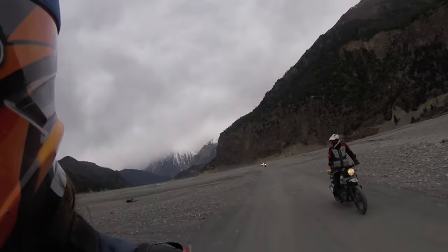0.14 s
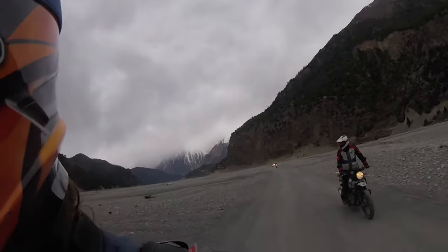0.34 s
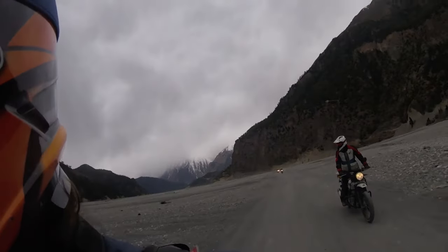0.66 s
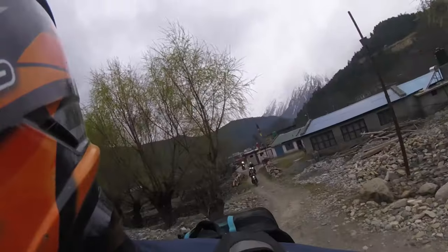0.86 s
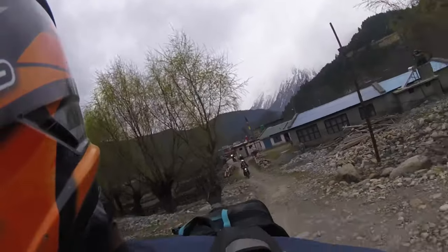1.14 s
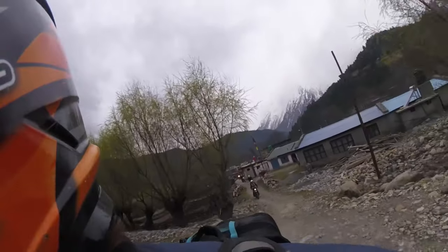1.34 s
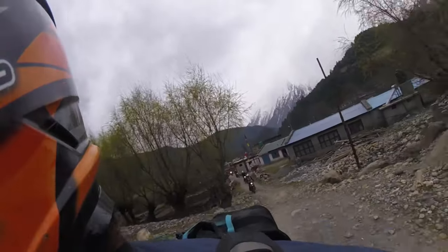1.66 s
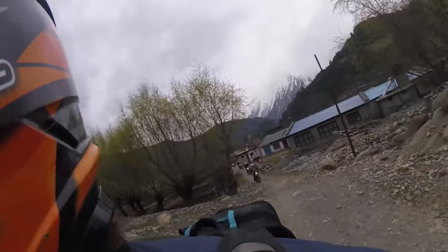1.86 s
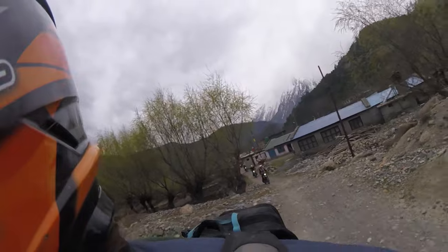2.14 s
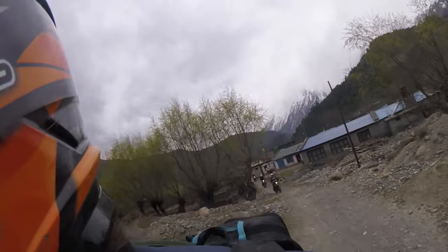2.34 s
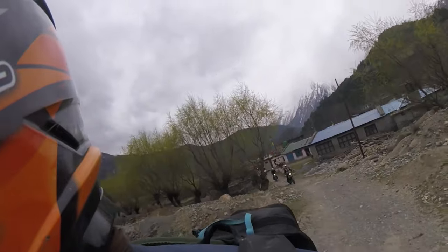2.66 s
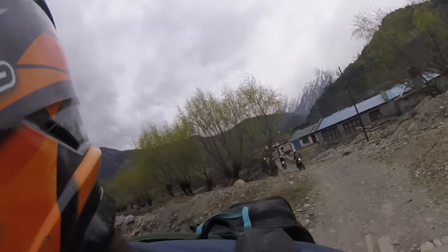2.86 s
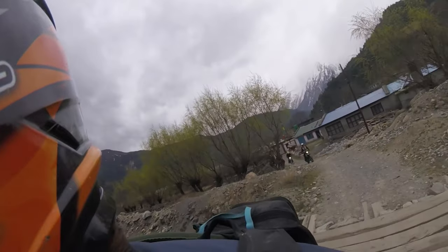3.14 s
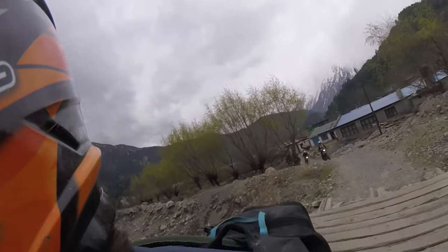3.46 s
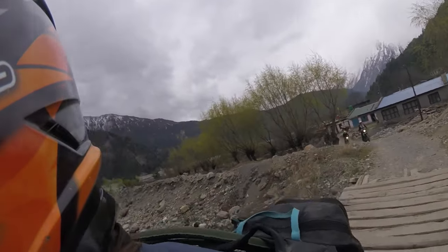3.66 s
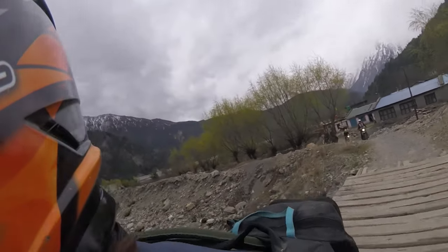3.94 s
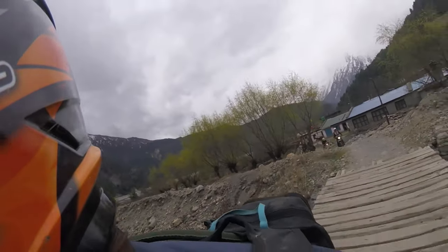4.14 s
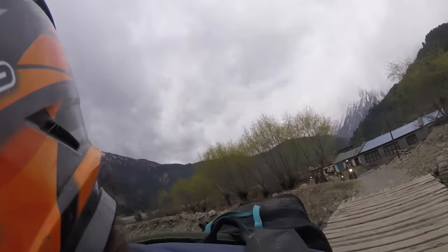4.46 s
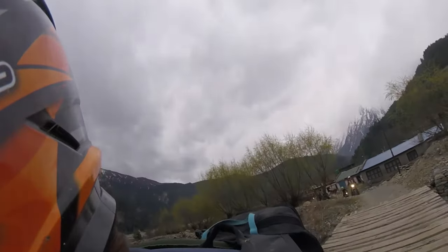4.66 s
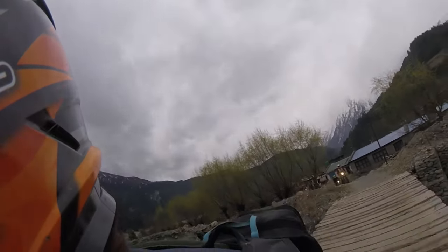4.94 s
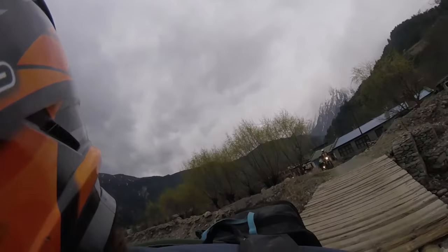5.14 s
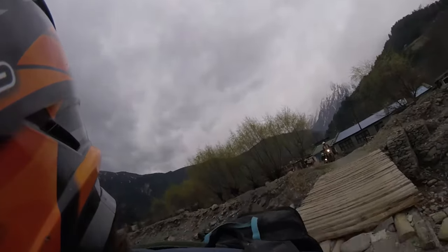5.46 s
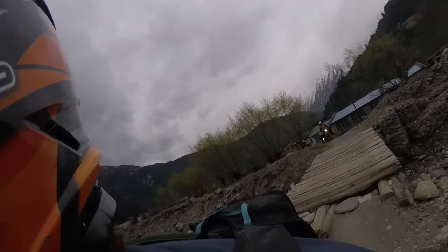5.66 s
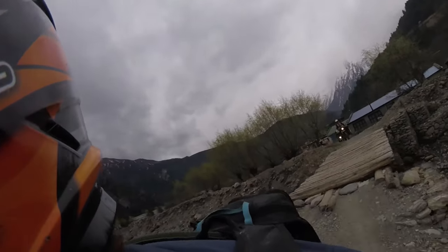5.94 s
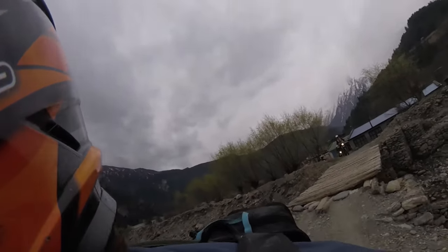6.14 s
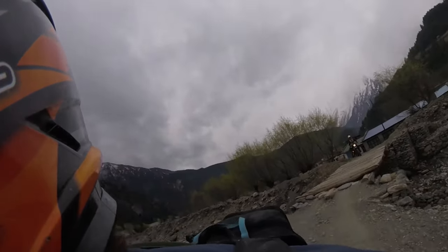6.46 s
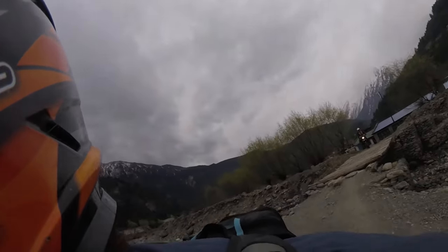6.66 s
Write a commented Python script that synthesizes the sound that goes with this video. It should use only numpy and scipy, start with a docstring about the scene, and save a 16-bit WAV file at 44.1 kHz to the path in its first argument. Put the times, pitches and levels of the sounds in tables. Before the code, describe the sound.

Rushing wind batters a microphone beside a motorcycle rider's helmet, then abruptly drops to a slower engine thudding along rough track and over hollow knocking planks.

```python
"""A single-cylinder motorcycle thuds, clatters and whines under a small cased microphone by the rider's helmet.
First a fast gravel flat in rushing wind; at 0.9 s, abruptly, a slow rough track and a plank bridge.
Engine: firing pulses through exhaust resonances, shaken noise through ringing metal, and a gear tone.
Wind: noise in four bands, with single swings of pressure at the case. Planks: decaying tones under each blow.
Close to the microphone: filtered noise bursts for ticks, scrapes, clacks and stones, and a treble hiss."""
import sys
import numpy as np
from scipy import signal
from scipy.fft import rfft, irfft
from scipy.io import wavfile
from scipy.ndimage import uniform_filter1d, minimum_filter1d

SR = 44100
rng = np.random.default_rng(int(sys.argv[2]) if len(sys.argv) > 2 else 0)


def persist_wave(psi):
    """Save psi, clipped to +-1, as 16-bit WAV."""
    counts = np.round(np.clip(psi, -1, 1) * 32767).astype(np.int16)
    wavfile.write(sys.argv[1], SR, np.atleast_2d(counts).T)


N = 299880
TIME = np.arange(N) / SR


def amp(db):
    """Decibels to gain."""
    return 10 ** (np.asarray(db) / 20)


def unit(x):
    """Scales to rms 1."""
    return x / np.sqrt(np.mean(x ** 2) + 1e-20)


def follow(rows, axis=1):
    """One column of a curve, interpolated at every sample."""
    rows = np.asarray(rows)
    return np.interp(TIME, rows[:, 0], rows[:, axis])


def add(mix, s, sound):
    """Mixes a sound in at a time in seconds."""
    part = mix[max(round(s * SR), 0):][:len(sound)]
    part += sound[:len(part)]


def colour(x, points, size=16384):
    """Causal minimum-phase filter with the given spectrum and falling skirts."""
    hz, db = np.transpose(points)
    bins = abs(np.fft.fftfreq(size, 1 / SR)) + 1
    skirt = np.minimum(bins / hz[0], 1) ** 2 * np.minimum(hz[-1] / bins, 1) ** 2
    gain = amp(np.interp(np.log(bins), np.log(hz), db)) * skirt
    log_gain = np.log(gain + 1e-6)
    taps = np.fft.ifft(np.exp(np.conj(signal.hilbert(log_gain)))).real[:size // 2]
    return signal.oaconvolve(x, taps)[:len(x)]


def band(x, lo_hz, hi_hz, order=6):
    """Keeps one band, with smooth edges."""
    hz = np.fft.rfftfreq(len(x), 1 / SR) + 1e-3
    return irfft(rfft(x) / (1 + (lo_hz / hz) ** order) / (1 + (hz / hi_hz) ** order), len(x))


def wander(lo_hz, hi_hz):
    """Random wavering between two rates, scaled to rms 1 and then clipped."""
    return np.clip(unit(band(rng.standard_normal(N), lo_hz, hi_hz)), -2.5, 2.5)


def steady(x, size=7000):
    """Evens the level to about rms 1, with the quick lumps kept; size in samples."""
    power = uniform_filter1d(uniform_filter1d(x ** 2, size), size // 2)
    return x / np.sqrt(abs(power) + 1e-20)


def swell(s, half_s):
    """A smooth rise and fall around one moment."""
    return np.exp(-.5 * ((TIME - s) / half_s) ** 2)


def swing(t, hz):
    """One swing of pressure, down and then up, of height 1."""
    u = 2 * np.pi * hz * t
    return u * np.exp((1 - u ** 2) / 2)


def ring(x, modes):
    """Passes a sound through parallel resonances."""
    return sum(amp(db) * signal.lfilter(*signal.iirpeak(hz, hz / width, SR), x) for hz, width, db in modes)


def resonate(x, hz, width):
    """A resonance that follows a moving pitch."""
    turn = np.exp(2j * np.pi * np.cumsum(hz) / SR)
    r = np.exp(-np.pi * width / SR)
    return 2 * (turn * signal.lfilter([1 - r], [1, -r], x / turn)).real


# Hiss inside the case: [t/s, level/dB]
HISS = [(0, -45.5), (0.5, -50.5), (0.88, -50.5), (0.93, -54.5), (1.7, -54), (2.3, -54.5), (2.64, -57.5),
        (2.9, -54.5), (3.45, -55.5), (3.9, -60.5), (4.35, -55), (4.9, -52.5), (5.25, -56.5), (6.15, -54.5),
        (6.52, -58), (6.8, -52)]
# Colour of the case around the microphone: [f/Hz, relative level/dB]
CASE = [(1500, -6), (3000, -13.5), (4400, -21), (5200, -15), (5680, -8.5), (5950, -13.5), (6270, -9.5),
        (6450, 1.5), (6620, -3.5), (6850, -5.5), (7400, -11.5), (8000, -16.5), (8280, -13.5), (8600, -17.5),
        (9300, -21.5), (9480, -18.5), (9700, -25), (10500, -39), (11300, -66)]


def hiss(cycle, grit_per_s=45):
    """Air, valve gear and fine grit excite the treble resonance of the case, over a faint fizz."""
    valves = 1 + .5 * np.exp(-(3 * cycle % 1) / 0.1)  # three pulses in each cycle
    grit = (rng.random(N) < grit_per_s / SR) * np.minimum(rng.exponential(13.0, N), 20)
    drive = valves * amp(0.95 * wander(1.2, 60)) * rng.standard_normal(N) + grit
    faint_fizz = amp(-76.5) * unit(band(rng.standard_normal(N), 7000, 13000))
    return unit(colour(drive, CASE)) * amp(follow(HISS)) + faint_fizz


# Airflow on the flat, swinging from low rumble to bright rush:
# [t/s, wind level/dB, extra rush/dB, extra rumble/dB, extra flapping/dB]
FAST_WIND = [(0, -17.5, -2.5, 10, 4), (0.19, -18.5, -2, -0.5, -1), (0.52, -26.5, 3.5, 5.5, -0.5),
             (0.66, -25.5, 1, 2, -1.5), (0.89, -20.5, 3.5, -3.5, -1.5)]
# Airflow on the track, rising and falling: same columns
SLOW_WIND = [(0.91, -20.5, 2, -7, -0.5), (1.2, -25.5, 4.5, -1.5, 4), (1.36, -20, 4, 2, 0),
             (1.65, -22.5, 1, -10, 2.5), (1.95, -21, -2, -1, 0.5), (2.25, -22.5, -4, -2, 1.5),
             (2.5, -27, -6.5, -4, 1.5), (2.8, -25.5, -0.5, -6, -0.5), (3.03, -26, 3.5, -2, -2),
             (3.25, -27, 0.5, 0, -0.5), (3.5, -30.5, 2, 0, 0.5), (3.8, -27.5, -2, 8, 0.5),
             (4.05, -25, -4.5, 5, -4.5), (4.25, -20.5, 0, -7.5, -6), (4.6, -24.5, -4, 4.5, -1.5),
             (5.3, -31.5, -0.5, 3, 0), (5.95, -17, -2.5, 1, -2), (6.8, -18.5, 1, 4.5, 0.5)]
# Wind colour on the flat, then on the track: [f/Hz, relative level/dB]
FAST_AIR = [(8.8, -19), (15, -13), (48, -11.5), (109, -5), (141, -8), (394, -10.5), (606, -15.5),
            (1240, -21), (1820, -29), (3810, -54.5), (4500, -59), (5850, -83), (9900, -120)]
SLOW_AIR = [(8.8, -34.5), (15, -3.5), (64, 3), (109, 0.5), (156, -1), (228, -6), (376, -13), (444, -15),
            (847, -29.5), (1000, -32.5), (1210, -38), (1540, -45), (4500, -77.5), (5850, -97.5),
            (9900, -120)]
# Gusts swell over the wind and lulls interrupt it: [t/s, change of level/dB, half length/s]
GUSTS = [(0.06, -6.5, 0.086), (0.151, 7, 0.0058), (0.257, -5, 0.0091), (0.399, 5, 0.015), (0.503, 5, 0.016),
         (0.638, 6.5, 0.057), (0.782, -6, 0.01), (1.925, -8.5, 0.0084), (2.258, 5, 0.031), (3.207, -5, .03),
         (3.688, 6, 0.078), (3.798, -10.5, 0.0078), (3.87, 7.5, 0.073), (4.445, -11, 0.016),
         (4.803, 5, 0.056), (6.422, 5.5, 0.044), (6.467, -13, 0.0083)]
RUMBLE_SHARE, RUSH_SHARE = 0.45, 1.07  # dB gained by rumble and rush for each dB of wind


def wind(curve, air, rumble_db, body_db, flap_db, rush_db, lumpy_db, spiky_db, patchy_db=1.5):
    """One wind strength drives four bands; the same eddies shape them all, cutting deeper into the rush."""
    mean_db = np.mean([row[1] for row in curve])
    gust_db = sum(db * swell(s, half) for s, db, half in GUSTS)
    force_db = follow(curve) - mean_db + gust_db
    eddies, flow = wander(2.1, 89), rng.standard_normal(N)
    soft = colour(flow * amp(lumpy_db * eddies), air)
    sharp = colour(flow * amp(spiky_db * eddies), air)

    rumble_level = rumble_db + RUMBLE_SHARE * force_db + follow(curve, axis=3) + patchy_db * wander(2.5, 7.2)
    rumble = steady(band(soft, 8.2, 64.0), size=6500) * amp(rumble_level)
    body = steady(band(soft, 77.8, 190), size=3200) * amp(body_db + force_db)
    flap = steady(band(soft, 206.6, 320), size=3200) * amp(flap_db + force_db + follow(curve, axis=4))
    rush_level = rush_db + RUSH_SHARE * force_db + follow(curve, axis=2) + patchy_db * wander(4.1, 12.4)
    rush = steady(band(sharp, 342, 6000), size=3500) * amp(rush_level)
    return amp(mean_db) * (rumble + body + flap + rush)


# The airflow booms briefly on one low note: [t/s, peak level/dB before level_db, f/Hz, half length/s]
BOOMS = [(1.37, -14.5, 112.4, 0.039), (1.445, -16.5, 135, 0.022), (1.59, -18, 163.5, 0.016),
         (1.831, -17, 136, 0.0049), (3.722, -18.5, 75.2, 0.018), (3.836, -16, 78, 0.019),
         (4.737, -19.5, 124.7, 0.029), (5.31, -22, 78.1, 0.029), (5.51, -21.5, 113, 0.042),
         (5.76, -18, 91, 0.018), (5.844, -11.5, 128.3, 0.0081), (6.022, -16, 103.9, 0.024),
         (6.09, -13, 78.7, 0.029), (6.268, -11.5, 95.1, 0.016), (6.305, -18, 161.9, 0.028),
         (6.41, -17, 130, 0.02), (6.757, -13, 135.1, 0.017)]


def booms(level_db=-1, waver=0.033):
    """The air at the case swings for a few cycles around one wavering pitch."""
    clock = np.cumsum(1 + waver * wander(4.2, 30)) / SR
    return sum(amp(db + level_db) * swell(s, half) * np.sin(2 * np.pi * hz * clock)
               for s, db, hz, half in BOOMS)


# The airflow tears off the case with a slap: [t/s, peak level/dB before level_db]
SLAPS = [(0.18, -12), (0.378, -16), (0.733, -15), (0.917, -26), (0.953, -21.5), (1.091, -25),
         (1.386, -19.5), (1.508, -28), (1.785, -26), (6.112, -29), (6.368, -21), (6.486, -28), (6.74, -24)]


def slaps(level_db=-0.5, front_s=0.0011, tear=0.16, tear_s=0.0021, low_hz=300, top_hz=900):
    """The airflow tears off the case: a steep front of pressure and a brief ragged tail."""
    out, t = np.zeros(N), np.arange(2048) / SR
    reach = signal.butter(3, [low_hz, top_hz], "band", fs=SR, output="sos")
    for s, db in SLAPS:
        front = (t / front_s - 1) * np.exp(-t / front_s)
        tail = tear * rng.standard_normal(len(t)) * np.exp(-t / tear_s)
        slap = signal.sosfilt(reach, front + tail)
        add(out, s, amp(db + level_db) * slap / abs(slap).max())
    return out


# Single eddies hit the case:
# [t/s, peak level/dB before level_db, f of the swing/Hz, level of the rush/dB before spurt_db]
BUFFETS = [(0.179, -8.5, 49.7, -24), (0.635, -1.5, 275, -20), (0.727, -14, 67, -22), (0.817, -7, 74, -49),
           (0.917, -12.5, 185, -30.5), (0.951, -10, 191, -37), (0.993, -10, 154, -36),
           (1.095, -8.5, 119, -30), (1.343, -4, 112, -42), (1.381, -5, 97, -23), (1.509, -5, 106, -26.5),
           (1.549, -11.5, 125, -28), (1.782, -10.5, 178, -34), (2.005, -11.5, 170, -55),
           (2.355, -12.5, 88, -37), (2.573, -6.5, 107, -40), (3.696, -21, 70, -33),
           (3.771, -8.5, 130.8, -56), (3.81, -10, 70, -46), (3.822, -3.5, 75, -46), (3.881, -12, 85, -40),
           (3.897, -11.5, 150, -37), (3.962, -17, 90, -47), (6.016, -7, 84.5, -43), (6.109, -10, 108, -41),
           (6.496, 1, 84.4, -24.5), (6.737, -5.5, 147, -28)]


def buffets(level_db=-3, spurt_db=1.5, lag_s=0.00556, rise_s=0.0028, spurt_s=0.0032):
    """A passing eddy sucks and then pushes on the case: one swing of pressure, with a spurt of rush."""
    out, t = np.zeros(N), np.arange(2048) / SR - .01  # starts early, to hold the suction
    for s, db, hz, rush_db in BUFFETS:
        rush = steady(band(rng.standard_normal(len(t)), 180, 400, order=3), size=300)
        age = np.maximum(t - rise_s, 0) / spurt_s
        spurt = rush * age * np.exp(1 - age)
        push = swing(t - lag_s, hz)
        add(out, s + t[0], amp(db + level_db) * push + amp(rush_db + spurt_db) * spurt)
    return out


def click(s=0.75, db=-20):
    """One thin, dry click, a decaying pulse, shortly before the fast wind breaks off."""
    out = np.zeros(N)
    add(out, s, amp(db) * np.exp(-np.arange(16.)))
    return out


# Colour of a light touch on the case: [f/Hz, relative level/dB]
TOUCH = [(800, -2.5), (1300, 1), (1800, -9), (3000, -10), (4100, -16), (5200, -8.5), (6000, -4.5),
         (6470, 5.5), (6900, 0.5), (7400, -6.5), (8500, -14.5), (9450, -17.5), (10200, -27), (11500, -66)]
# Gear and grit tick on the case: [t/s, peak level/dB, thinned below f/Hz]
TICKS = [(0.4913, -29, 3500), (0.502, -27.5, 3500), (0.5816, -25.5, 4500), (0.6727, -36, 2000),
         (0.829, -30.5, 3500), (0.891, -31, 3500), (0.9648, -33, 3000), (1.042, -38, 3000),
         (1.102, -37, 3000), (3.3525, -36, 4500), (3.48, -34.5, 2000), (4.0365, -37, 3500),
         (4.1375, -33, 2500), (4.2693, -30.5, 5000), (4.476, -32.5, 1500), (4.833, -42, 1500),
         (4.924, -34.5, 3000), (4.9505, -37.5, 3000)]


def ticks(t60_s=0.016):
    """Gear and grit tap the case: short bright snaps of decaying noise."""
    out, t = np.zeros(N), np.arange(4096) / SR
    for s, db, thin_hz in TICKS:
        snap = rng.standard_normal(len(t)) * amp(-60 * t / t60_s)
        snap[0] += 2
        tick = signal.lfilter(*signal.butter(1, thin_hz, "high", fs=SR), colour(snap, TOUCH))
        add(out, s, amp(db) * tick / abs(tick).max())
    return out


# Gear slips along the case: [t/s at its strongest, level/dB before level_db, half length/s,
# f of the squeak/Hz, glide of the squeak/Hz per ms, share of squeak 0-1]
SCRAPES = [(4.139, -42, 0.0025, 6100, 0, 0.8), (4.145, -44, 0.0024, 6150, 0, 0.7),
           (4.16, -44, 0.0016, 6700, 0, 0.5), (4.168, -46, 0.001, 7000, 0, 0.3),
           (4.174, -41, 0.0013, 6640, 0, 0.7), (4.181, -41, 0.0017, 6500, 0, 0.35),
           (4.184, -46.5, 0.024, 6800, 0, 0.2), (4.1927, -34, 0.001, 7300, 0, 0.5),
           (4.199, -43, 0.0018, 7000, 0, 0.5), (4.2026, -36, 0.0016, 8080, 200, 0.8),
           (4.2363, -30.5, 0.00087, 6760, 852, 0.9), (4.344, -52.5, 0.052, 6560, 0, 0.2),
           (4.724, -35.5, 0.0047, 6550, 0, 0.3), (4.767, -44, 0.0052, 6500, 0, 0.3),
           (5.052, -40, 0.0048, 6400, 0, 0.1)]


def scrapes(level_db=1, grain_db=5.0, squeak_width_hz=450, catches_per_s=450, grit=0.73):
    """Gear slips grainily along the case, each slip squeaking at its own, sometimes rising pitch."""
    out = np.zeros(N)
    catches = rng.standard_normal(N) * (rng.random(N) < catches_per_s / SR)
    grain = unit(rng.standard_normal(N) * amp(grain_db * wander(60, 390)))
    rub = steady(colour(unit(grain + grit * unit(catches)), TOUCH), size=300)
    for s, db, half, hz, glide, share in SCRAPES:
        near = abs(TIME - s) < 4 * half
        pitch = hz + glide * 1000 * (TIME[near] - s)
        tone = resonate(rng.standard_normal(len(pitch)), pitch, squeak_width_hz)
        tone = unit(resonate(tone, pitch, squeak_width_hz))  # a second pass narrows the squeak
        slip = unit((1 - share) * rub[near] + share * tone)
        out[near] += amp(db + level_db) * swell(s, half)[near] * slip
    return out


# A buckle clacks against the case: [t/s, peak level/dB, decay of its chatter/s, brightness/dB per octave]
CLACKS = [(0.6098, -19.5, 0.00054, -4.5), (4.693, -37.5, 0.013, -4), (4.7188, -31, 0.003, -14),
          (4.725, -30, 0.0028, -6), (4.7345, -23, 0.0015, -1), (4.7488, -22, 0.002, -6),
          (4.7508, -14, 0.0014, 5), (4.7526, -13.5, 0.0012, 11), (5.047, -38, 0.0015, -7)]
# What the case rings with when hit: [f/Hz, width/Hz, level/dB before the brightness]
SHELL = [(2250, 150, -2), (3360, 160, -5.5), (4000, 350, -12.5), (5130, 100, -8), (5350, 110, -3),
         (6490, 164, 13), (8700, 180, -27), (9160, 160, -29)]


def clacks(direct=0.033, strike=4):
    """A hard contact cracks, chatters and rings the plastic shell; duller ones favour its low modes."""
    out, t = np.zeros(N), np.arange(3000) / SR
    reach = signal.butter(10, [500, 10000], "band", fs=SR, output="sos")
    for s, db, length, bright in CLACKS:
        chatter = rng.standard_normal(len(t)) * np.exp(-t / length)
        chatter[0] += strike
        modes = [(hz, width, level + bright * np.log2(hz / SHELL[0][0])) for hz, width, level in SHELL]
        clack = signal.sosfilt(reach, ring(chatter, modes) + direct * chatter)
        add(out, s, amp(db) * clack / abs(clack).max())
    return out


# Stones pop from under the tyres: [t/s, level/dB, f/Hz]
STONES = [(3.859, -44, 1290), (4.18, -50, 2500), (4.193, -46, 1700), (4.199, -52, 2700), (4.213, -39, 1330),
          (4.379, -43.5, 1500), (4.741, -41, 2000), (5.865, -36.5, 1500), (6.573, -37.5, 1300)]


def stones(ring_s=0.0011, spread=0.98):
    """A stone pops as a short, dry burst of noise around one pitch."""
    out, t = np.zeros(N), np.arange(3000) / SR
    for s, db, hz in STONES:
        # the band edges overlap, which leaves a narrow peak
        crunch = unit(band(rng.standard_normal(len(t)), hz / spread, hz * spread))
        add(out, s, amp(db) * crunch * t / ring_s * np.exp(1 - t / ring_s))
    return out


# A brake drags faintly on the way onto the bridge: [t/s, f/Hz before waver, level/dB before flutter]
BRAKE = [(2.95, 470, -65), (3.06, 460, -41.5), (3.17, 462.7, -40), (3.26, 458, -48), (3.42, 458, -34.5),
         (3.52, 458, -49), (3.62, 449.6, -44)]


def brake(waver=0.0097, flutter_db=3):
    """The dragging brake moans: a thin, wavering tone that comes and goes."""
    turns = np.cumsum(follow(BRAKE) * (1 + waver * wander(3.6, 60))) / SR
    dragging = (TIME > BRAKE[0][0]) & (TIME < BRAKE[-1][0])
    level = amp(follow(BRAKE, axis=2) + flutter_db * wander(4.7, 40))
    return dragging * level * np.sin(2 * np.pi * turns)


# The wheels knock on planks: [t/s, peak level/dB before level_db, loose rattle 0-1,
# decay of the rattle/s, brightness/dB per octave, pitch of the board as a ratio]
KNOCKS = [(3.3073, -9.5, 0.22, 0.014, -11, 1.0), (3.382, -19, .6, 0.017, -10, 1.24),
          (3.392, -23.5, 1, 0.015, -2, 1.08), (3.696, -15, 0.5, 0.012, -13, 0.73),
          (3.7114, -13, 0.22, 0.011, 6, 1.07), (3.723, -21, 0.35, 0.0083, 5, 1.02),
          (3.83, -24.5, 0.5, 0.018, -1, 1.24), (3.856, -16.5, 0.07, 0.0035, 15, 1.12),
          (3.897, -19, 0.74, 0.02, -6, 0.96), (3.912, -18, 0.5, 0.01, 9, 0.97),
          (3.934, -18, 0.36, 0.01, 5, 0.97), (4.211, -16, 0.6, 0.008, -6.5, 1.12),
          (4.377, -18, 0.04, 0.004, 10, 1.03), (4.692, -17, 0.17, 0.0053, 2, 1.12),
          (4.729, -13.5, 0.8, 0.015, -2, 0.96), (6.427, -14, 0.03, 0.0055, 5, 1.03)]
# What the bridge rings with: [f/Hz before the pitch ratio, level/dB before the brightness, t60/s]
PLANK = [(246, -3, 0.023), (323, 3, 0.084), (361, 6.5, 0.055), (449.3, 2, 0.11), (536, -3, 0.11),
         (620, 5.5, 0.044), (815, -13.5, 0.12), (1164, -18, 0.024)]


def planks(level_db=-2, loose=0.28, soft_hz=1050, bounces_per_s=1800,
           thud=0.9, thud_hz=170, thud_lag_s=0.00074):
    """A tyre blow, with a loose rattle, rings each board at its own pitch and thuds most on a tight one."""
    out, t = np.zeros(N), np.arange(12000) / SR
    soften = signal.butter(3, soft_hz, fs=SR, output="sos")
    early_s = .01  # the thud starts early, to hold its downward swing
    for s, db, rattle, rattle_s, bright, pitch in KNOCKS:
        board = sum(amp(level + bright * np.log2(hz) - 60 * t / t60) * np.sin(2 * np.pi * hz * pitch * t)
                    for hz, level, t60 in PLANK)
        bounces = unit(rng.standard_normal(len(t)) * (rng.random(len(t)) < bounces_per_s / SR))
        blow = loose * rattle * bounces * np.exp(-t / rattle_s)
        blow[0] += 1
        knock = signal.sosfilt(soften, signal.fftconvolve(board, blow)[:len(t)])
        add(out, s, amp(db + level_db) * knock / abs(knock).max())
        push = thud * (1 - rattle) * swing(t - early_s - thud_lag_s, thud_hz * pitch)
        add(out, s - early_s, amp(db + level_db) * push)
    return out


# Engine speed: [t/s, firings per second before the wavering]
FIRING = [(0, 17.7), (0.899, 17.7), (0.9, 13.7), (1.35, 12.8), (1.65, 14.57), (1.8, 16.02), (2.1, 18.22),
          (2.55, 17.72), (2.7, 14.31), (3.0, 13.27), (4.05, 12.25), (4.5, 10.39), (4.8, 12.62),
          (5.1, 12.06), (5.55, 15.02), (5.85, 13.26), (6.15, 17.44), (6.3, 14.87), (6.8, 17.33)]


def engine_cycle():
    """Counts engine cycles, one firing each, at a slightly wavering speed."""
    return np.cumsum(follow(FIRING) * (1 + 0.0073 * wander(0.91, 11.9))) / SR


# Gear whine: [t/s, level/dB before the engine cycle and the unevenness]
WHINE = [(0.9, -52), (1.5, -47.5), (2.0, -49.5), (3.0, -49), (3.6, -55), (4.2, -48), (4.6, -52.5),
         (5.3, -51.5), (5.58, -40), (5.8, -43), (6.15, -39), (6.3, -60), (6.8, -45)]


def whine(cycle, pitch_hz=1000, peak_phase=0.064, half_phase=0.094, second=0.44, second_phase=0.55,
          held=0.12, waver=0.013, uneven_db=1, overtone_db=-25):
    """The gears sing on both turns of the crank, loudest on the power stroke, at a wavering pitch."""
    load = held
    for size, phase in [(1, peak_phase), (second, second_phase)]:
        distance = (cycle - phase + .5) % 1 - .5
        load = load + size * np.exp(-.5 * (distance / half_phase) ** 2)
    turns = np.cumsum(pitch_hz * (1 + waver * wander(6.6, 70))) / SR
    note = np.sin(2 * np.pi * turns) + amp(overtone_db) * np.sin(2 * np.pi * 3 * turns)
    return amp(follow(WHINE) + uneven_db * wander(2, 13)) * load * note


# Engine load: [t/s, exhaust level/dB, ringing metal level/dB]
LOAD = [(0, -47.5, -36.5), (0.9, -41.5, -69), (1.4, -35, -48), (2.0, -37, -55.5), (2.45, -30, -47),
        (2.65, -41.5, -54), (3.0, -31.5, -50), (3.55, -32.5, -55.5), (4.05, -34.5, -58), (4.3, -31.5, -54),
        (4.6, -37, -55.5), (5.0, -31.5, -50), (5.33, -28, -57.5), (5.58, -24.5, -48), (6.15, -29, -48),
        (6.27, -30.5, -59), (6.8, -22.5, -41.5)]
# Resonances of the exhaust: [f/Hz before the drift, width/Hz, relative level/dB]
EXHAUST = [(79, 6.9, 7), (111.3, 6.5, 1.5), (144.4, 11, -10.5), (233, 32, -19.5), (302, 55, -14)]
# The engine's metal rings under load: [f/Hz, width/Hz, relative level/dB]
METAL = [(740, 140, 1.5), (946, 52, -1.5), (1297, 30, -10)]
# Colour of the steady mechanical clatter: [f/Hz, relative level/dB]
CLATTER = [(500, -8), (780, 7.5), (1100, -2.5), (1350, -9.5), (1850, -9.5), (2650, -17.5), (2950, -14.5),
           (3350, -24), (4200, -32.5)]


def engine(cycle, clatter_db=-56.0, load_share=0.82, uneven_db=3, drift=0.082, gas=0.02):
    """Each firing puffs into the exhaust, whose pitch wanders, and shakes the metal; the valves tap later."""
    number, phase = cycle.astype(int), cycle % 1
    strength = amp(uneven_db * rng.standard_normal(number[-1] + 1))[number]  # each firing differs
    gas_noise = gas * np.exp(-phase / 0.18) * rng.standard_normal(N)
    puff = strength * (np.diff(number, prepend=0) + gas_noise)
    tuning = 1 + drift * wander(1.55, 10.4)
    pipe = sum(amp(db) * resonate(puff, hz * tuning, width) for hz, width, db in EXHAUST)
    exhaust = steady(band(pipe, 33, 300))

    combustion = phase / .13 * np.exp(1 - phase / .13)
    valve = .7 * np.exp(-((cycle + .58) % 1) / .1)
    shake = strength * (1.2 + combustion + valve)
    metal = steady(band(ring(shake * rng.standard_normal(N), METAL), 400, 1900), size=3600)

    exhaust_db = follow(LOAD, axis=1)
    labour_db = exhaust_db - exhaust_db.mean()  # the clatter is harder under load
    clatter = unit(colour(shake * rng.standard_normal(N), CLATTER))
    clatter = amp(clatter_db + load_share * labour_db) * clatter
    return exhaust * amp(exhaust_db) + metal * amp(follow(LOAD, axis=2)) + clatter


def scene(cut_s=0.899):
    """Wind, engine and the knocks of the track at one microphone; the fast wind gives way at cut_s."""
    fast = np.clip((cut_s - TIME) * 500, 0, 1)  # a 2 ms crossfade
    cycle = engine_cycle()
    gale = wind(FAST_WIND, FAST_AIR, rumble_db=-3.0, body_db=-5.5, flap_db=-9, rush_db=-8.0,
                lumpy_db=1.5, spiky_db=2)
    breeze = wind(SLOW_WIND, SLOW_AIR, rumble_db=-8.5, body_db=-4.5, flap_db=-10.5, rush_db=-18,
                  lumpy_db=2.0, spiky_db=2.5)
    air = hiss(cycle) + fast * gale + (1 - fast) * breeze + booms() + slaps() + buffets()
    contacts = click() + ticks() + scrapes() + clacks()
    track = stones() + brake() + planks()
    mix = air + contacts + track + whine(cycle) + engine(cycle)
    return (mix * signal.windows.tukey(N, .001))[None]  # short fades at both ends


def record(dry, ceiling=0.52, size=300, edge_hz=13500):
    """The microphone's limiter holds down the largest swings; then a low-pass sets the band limit."""
    gain = np.minimum(1, ceiling / (abs(dry) + 1e-9))
    limited = dry * uniform_filter1d(minimum_filter1d(gain, size), size)
    low_pass = signal.firwin(255, edge_hz, window=("kaiser", 8), fs=SR)
    return signal.oaconvolve(limited, low_pass[None], "same")


dry = scene()
out = record(dry)
persist_wave(out)
```